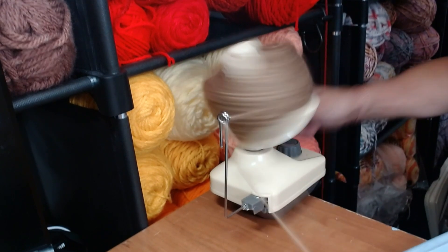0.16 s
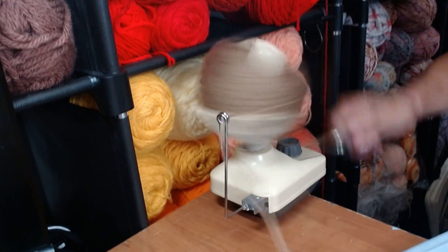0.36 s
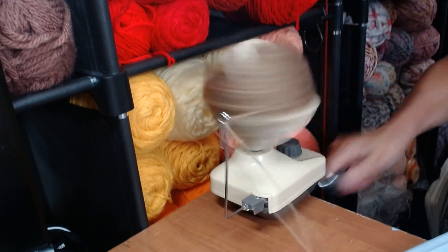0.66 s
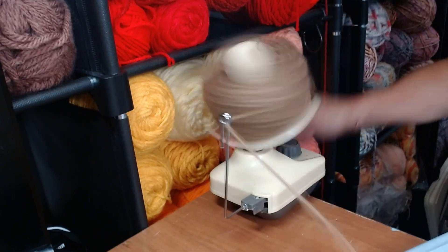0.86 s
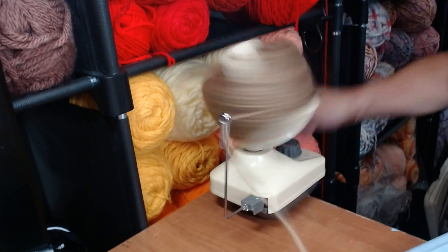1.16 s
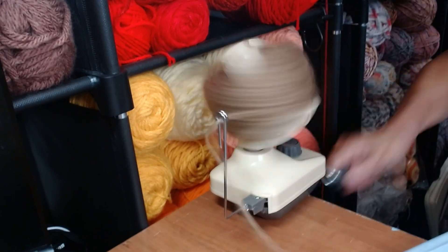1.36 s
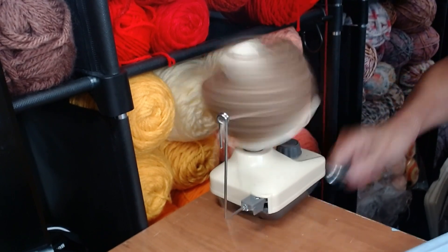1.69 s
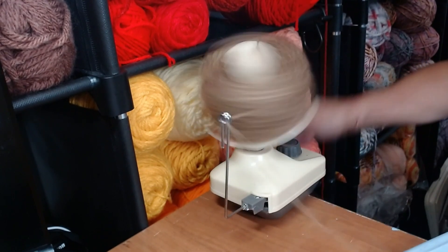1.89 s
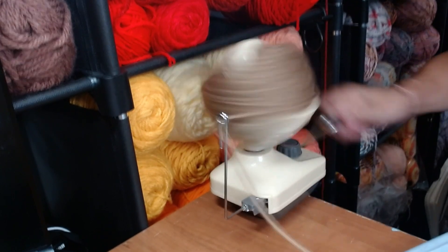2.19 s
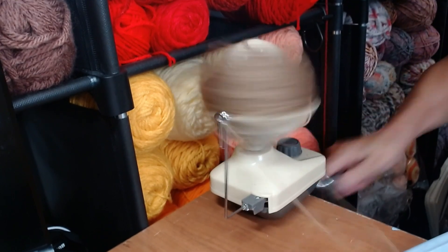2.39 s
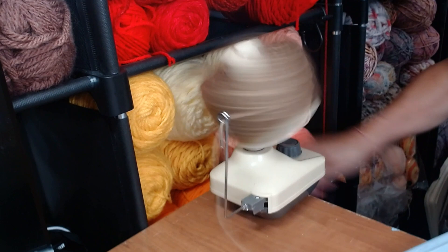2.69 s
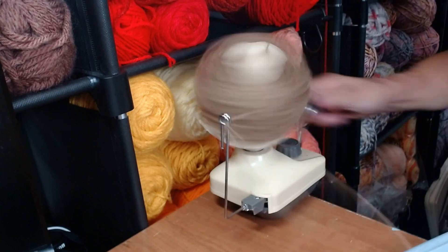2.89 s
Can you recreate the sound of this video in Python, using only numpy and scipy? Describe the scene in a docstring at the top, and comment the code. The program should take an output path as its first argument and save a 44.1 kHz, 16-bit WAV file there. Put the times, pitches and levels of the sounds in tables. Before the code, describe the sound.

A hand-cranked yarn winder hums and rattles in quick, even surges on a table.

```python
"""Yarn winder on a table

Close up in a small, dry room, one microphone. A plastic winder spins a ball of yarn, surging with each
turn of the crank, nearly three a second. Its gear teeth hum and rattle in the housing, faster and louder
in each turn, and shake the table. The yarn hisses, its wire guide chatters, something rubs about once
a turn and the plastic knocks a few times; the last turns are gentler."""
import sys
import numpy as np
from scipy import signal
from scipy.fft import rfft, irfft
from scipy.io import wavfile
from scipy.ndimage import uniform_filter1d

SR = 44100
rng = np.random.default_rng(int(sys.argv[2]) if len(sys.argv) > 2 else 0)


def unload_audio(sound):
    """Save the sound as a 16-bit wav file, at the path given as the first command line argument."""
    columns = np.transpose(np.atleast_2d(sound))
    # keep every value between -1 and 1, then stretch to whole-number steps
    steps = np.round(np.clip(columns, -1, 1) * 32767)
    wavfile.write(sys.argv[1], SR, steps.astype(np.int16))


N = 134505
T = np.arange(N) / SR

# Levels in the tables are relative, ahead of each layer's gain.
# gear speed: (time [s], tooth rate [Hz])
TOOTH_RATE = [(.06, 153.5), (.12, 134.2), (.2, 160), (.3, 179.2), (.4, 170.2), (.46, 140), (.53, 166.9),
              (.77, 179.9), (.8, 141.7), (.84, 163), (.93, 179.5), (1.1, 187.7), (1.16, 140.9),
              (1.28, 170.2), (1.35, 181.7), (1.45, 178.9), (1.51, 144.3), (1.63, 173.7), (1.81, 173.4),
              (1.86, 129.4), (1.92, 160.9), (2.09, 190), (2.2, 138), (2.33, 166.4), (2.54, 184),
              (2.61, 137.8), (2.72, 168.7), (2.79, 174), (2.94, 151.3), (3.05, 166.2)]
# gear hum: (time [s], level [dB])
HUM_LEVELS = [(0, -42.5), (.1, -42), (0.27, -29), (0.39, -32.5), (0.46, -56.5), (0.57, -30), (0.77, -32),
              (0.82, -50.5), (0.94, -24), (0.98, -36), (1.09, -23), (1.15, -42), (1.32, -28), (1.45, -30),
              (1.49, -56), (1.66, -28.5), (1.81, -41), (1.88, -68.5), (1.94, -45.5), (2.08, -28.5),
              (2.21, -62.5), (2.4, -31.5), (2.49, -44), (2.53, -31), (2.59, -64), (2.76, -34), (2.93, -59),
              (3.05, -56)]
# strongest throb of the lopsided ball in each turn: (time [s])
TURN_TIMES = [0.245, 0.597, 0.945, 1.294, 1.65, 2.012, 2.384, 2.745]
# tooth rattle, which stands for the load on the gears: (time [s], level [dB])
RATTLE_LEVELS = [(0.0, -48.5), (0.05, -43), (0.11, -46), (0.14, -42), (0.35, -39), (0.42, -55.5),
                 (0.58, -38), (0.81, -50.5), (1.04, -38.5), (1.04, -45), (1.24, -48), (1.26, -40),
                 (1.75, -51.5), (2.27, -53), (2.29, -48), (2.38, -56.5), (2.46, -43), (2.5, -61.5),
                 (2.8, -54), (2.85, -63.5), (3.05, -59)]
# plastic housing: (frequency [Hz], width [Hz], level [dB])
HOUSING_MODES = [(272, 29, -7), (347.3, 55, -4.5), (375.2, 24, 1), (433.7, 41, -6), (527.3, 54, -8.5),
                 (618.2, 21.8, 6), (666, 45, 4.5), (771, 65, -2.5), (892, 80, -9), (1024, 73, -13.5),
                 (1154, 53, -14), (1555, 46.5, -4)]
# table top: (frequency [Hz], width [Hz], level [dB])
TABLE_MODES = [(81, 35, 2), (100, 20, 0.5), (162, 62, 1.5)]
# overtones of the hum: (multiple of the tooth rate, level [dB])
HUM_OVERTONES = [(3, -50), (4, -55), (5, -57)]
# yarn sliding through the guide: (frequency [Hz], level [dB])
YARN_SPECTRUM = [(1700, 6), (2350, -5), (3200, 9), (4400, -11.5), (5600, -2.5), (7000, -8.5), (8000, -42.5)]
# yarn snagging and slipping: (time [s], level [dB], half length [s])
YARN_SNAGS = [(.1635, -49, 0.00056), (.935, -63.5, 0.008), (1.233, -57, 0.0022), (2.038, -60.5, 0.0094),
              (2.523, -57.5, 0.0028)]
# room tone: (frequency [Hz], level [dB])
ROOM_SPECTRUM = [(20, -0.5), (70, -4), (150, 2), (430, -4.5), (1000, -13), (2500, -26), (7000, -38.5)]
# touches of the wire guide: (time [s], level [dB])
GUIDE_TOUCHES = [(0.0316, -39), (0.0817, -38), (0.1778, -44), (0.19, -34), (0.2384, -32.5), (0.2634, -25.5),
                 (0.2821, -22.5), (0.3293, -23), (0.3518, -33), (0.4496, -38), (0.5023, -36.5),
                 (0.566, -37), (0.6722, -26), (0.6857, -31), (0.7011, -41), (0.783, -40.5), (0.875, -36),
                 (0.9538, -26), (1.01, -29), (1.0378, -30), (1.07, -32.5), (1.1053, -35), (1.1904, -39.5),
                 (1.3781, -32.5), (1.4275, -34.5), (1.4451, -27), (1.518, -30), (1.5431, -31.5),
                 (1.5504, -38), (1.734, -33), (1.758, -34), (1.7744, -43), (1.8649, -46), (2.0468, -34),
                 (2.0948, -38), (2.1855, -45), (2.2741, -43.5), (2.4218, -32), (2.4415, -33),
                 (2.4626, -37.5), (2.655, -45.5), (2.9375, -40.5)]
# ring of the wire guide: (frequency [Hz], level [dB], t60 [s])
GUIDE_MODES = [(2747, -10.5, 0.024), (3053, -14, 0.023), (3388, -7.5, 0.015), (3563, -5, 0.017),
               (3780, 1.5, 0.011), (3973, -2, 0.013), (4607, -23.5, 0.049), (5637, -12, 0.017),
               (5997, -10, 0.011), (6940, -27, 0.025)]
# the base bumping on the table: (time [s], level [dB])
BASE_BUMPS = [(.135, -50.5), (.24, -47.5), (.305, -40), (.71, -43.5), (1.023, -50), (1.095, -46),
              (1.365, -45.5), (1.72, -45.5), (2.086, -44.5), (2.541, -49), (2.801, -51)]
# rubs as the crank turns: (time [s], level [dB], half length [s])
TURN_RUBS = [(0.255, -49.5, 0.064), (0.535, -50.5, 0.011), (0.619, -41, 0.0078), (0.883, -50.5, 0.012),
             (0.975, -48, 0.075), (1.313, -41.5, 0.011), (1.67, -41.5, 0.013), (2.038, -48.5, 0.019),
             (2.391, -50, 0.021), (2.762, -55, 0.026)]
# loose plastic knocking: (time [s], level [dB])
PLASTIC_KNOCKS = [(1.1252, -37), (1.1391, -31), (1.477, -32.5), (1.4902, -27.5), (1.505, -31.5)]
# ring of the knocked plastic: (frequency [Hz], level [dB], t60 [s])
PLASTIC_MODES = [(1057, -15, 0.03), (1148, -3, 0.048), (1260, -10, 0.016), (1983, -13.5, 0.03),
                 (2170, -8, 0.012), (3000, -11.5, 0.027), (3350, -8, 0.0097), (4470, -7.5, 0.0028)]

HUM_THROB, RATTLE_THROB = 0.51, 0.28  # depth, as a share of the amplitude


def from_db(db):
    """Decibels to gain."""
    return 10 ** (np.asarray(db) / 20)


def rms_one(x):
    """Scale to unit rms."""
    return x / np.sqrt(np.mean(x ** 2) + 1e-20)


def hold_level(x, samples):
    """Hold a sound at unit level over a sliding window."""
    power = uniform_filter1d(uniform_filter1d(x * x, samples), samples)
    return x / np.sqrt(np.abs(power) + 1e-20)


def in_time(rows):
    """Join (time, value) points by straight lines."""
    return np.interp(T, *np.transpose(rows))


def swells(rows):
    """Bell-shaped swells from (time [s], level [dB], half length [s]) rows."""
    return sum(from_db(db) * np.exp(-.5 * ((T - s) / half) ** 2) for s, db, half in rows)


def phase_of(hz):
    """Running phase of a changing frequency."""
    return 2 * np.pi * np.cumsum(hz) / SR


def butter(x, kind, hz, order):
    """Butterworth filter."""
    return signal.sosfilt(signal.butter(order, hz, kind, fs=SR, output="sos"), x)


def drift(hz):
    """Smooth random wandering, mostly slower than hz, spread 1."""
    bins = np.arange(N // 2 + 1) * SR / N
    return rms_one(irfft(rfft(rng.standard_normal(N)) / (1 + (bins / hz) ** 2), N))


def noise(spectrum):
    """Noise with the given colour, rms 1."""
    hz, db = np.transpose(spectrum)
    bins = np.maximum(np.arange(N // 2 + 1) * SR / N, 1)
    colour = from_db(np.interp(np.log(bins), np.log(hz), db))
    return rms_one(irfft(rfft(rng.standard_normal(N)) * colour, N))


def clicks(times, sizes):
    """One impulse per contact."""
    return np.bincount(np.clip(times * SR, 0, N).astype(int), sizes, N + 1)[:N] + 1e-18


def resonate(x, modes):
    """Drive a body's resonances in parallel, signs alternating."""
    out = 0
    for k, (hz, width, db) in enumerate(modes):
        r, w = np.exp(-np.pi * width / SR), 2 * np.pi * hz / SR
        gain = (-1) ** k * from_db(db) * (1 - r * r) / 2
        out += gain * signal.lfilter([1, 0, -1], [1, -2 * r * np.cos(w), r * r], x)
    return out


def strike(times, db, modes):
    """Each contact rings every mode with a strength of its own."""
    out, spread_db = 0, rng.standard_normal((len(times), len(modes)))
    for k, (hz, mode_db, t60) in enumerate(modes):
        r, w = from_db(-60 / (t60 * SR)), 2 * np.pi * hz / SR
        hits = clicks(times, from_db(db + mode_db + spread_db[:, k]))
        out += (-1) ** k * signal.lfilter([0, r * np.sin(w)], [1, -2 * r * np.cos(w), r * r], hits)
    return out


def ball_throb(depth, period_s=0.0777):
    """The lopsided ball wobbles, swelling and pinching the sound about five times a turn."""
    turns = np.array(TURN_TIMES)
    nearest = turns[np.argmin(np.abs(T[:, None] - period_s - turns), axis=1)]
    wobble = uniform_filter1d(np.cos(2 * np.pi * (T - nearest) / period_s), size=400)
    return 1 + depth * wobble


def crank_pace(lag_s=.033):
    """Pace of the crank: 1 at the fastest point of each turn, 0 at the slowest."""
    turn_s = np.mean(np.diff(TURN_TIMES))
    fastest = np.r_[TURN_TIMES[0] - turn_s, TURN_TIMES, TURN_TIMES[-1] + turn_s] + lag_s
    turns_done = np.interp(T, fastest, np.arange(len(fastest)))
    return np.cos(np.pi * turns_done) ** 2


def gear_hum(gain_db=-4, jitter=.035, roughness=.15):
    """The meshing gears sound a tone at the tooth rate, a little rough and throbbing."""
    hz = in_time(TOOTH_RATE) * (1 + jitter * drift(hz=46))
    tone = np.sqrt(2) * np.sin(phase_of(hz))
    level = from_db(in_time(HUM_LEVELS) + gain_db) * ball_throb(HUM_THROB)
    return level * (1 + roughness * drift(hz=36)) * tone


def tooth_rattle(gain_db=-3, jitter_teeth=.03, spread_db=4.5, grit_db=-2.5):
    """Each tooth taps the housing unevenly, then slides with a little grit."""
    teeth_passed = np.cumsum(in_time(TOOTH_RATE)) / SR
    teeth = np.arange(1, int(teeth_passed[-1]))
    lateness, force = rng.standard_normal((len(teeth), 2)).T
    tap_times = np.interp(teeth + jitter_teeth * lateness, teeth_passed, T)
    taps = clicks(tap_times, from_db(spread_db * force))
    grit = rng.standard_normal(N) * (1 - teeth_passed % 1) ** 2
    housing = resonate(rms_one(taps) + from_db(grit_db) * rms_one(grit), HOUSING_MODES)
    housing = butter(housing, "band", hz=[220, 2200], order=2)
    level = from_db(in_time(RATTLE_LEVELS) + gain_db) * ball_throb(RATTLE_THROB)
    return level * hold_level(housing, samples=1100)


def table_rumble(hum_db, load_db, gain_db=-48.5):
    """The shaking base makes the table rumble, partly following the hum and the load."""
    top = resonate(rng.standard_normal(N), TABLE_MODES)
    rumble = butter(top, "band", hz=[60, 190], order=2)
    return from_db(gain_db + 0.28 * hum_db + 0.6 * load_db) * hold_level(rumble, samples=2000)


def gear_whine(load_db, slow_hz=390, fast_hz=1010, crank_db=-49, jitter=.018, flicker_db=3.5):
    """The crank gear's whine arches through the housing's resonances each turn, over the hum's overtones."""
    partials = [(slow_hz + (fast_hz - slow_hz) * crank_pace(), crank_db)]
    partials += [(multiple * in_time(TOOTH_RATE), db) for multiple, db in HUM_OVERTONES]
    unsteady = 1 + jitter * drift(hz=40.8)
    tones = 0
    for hz, db in partials:
        tones += from_db(db + flicker_db * drift(hz=25)) * np.sin(phase_of(hz * unsteady))
    roughness = 1 + .3 * drift(hz=40)
    return from_db(.7 * load_db) * roughness * resonate(tones, HOUSING_MODES)


def yarn_hiss(load_db, gain_db=-66, flicker_db=1.5):
    """The running yarn gives a grainy hiss, and a brighter rasp where it snags."""
    rasp = rms_one(butter(noise(YARN_SPECTRUM), "high", hz=4300, order=4))
    level = from_db(gain_db + 0.96 * load_db + flicker_db * drift(hz=110))
    return level * noise(YARN_SPECTRUM) + swells(YARN_SNAGS) * rasp


def room_tone(level_db=-58):
    """The room's own low, steady noise behind the winder."""
    return from_db(level_db) * noise(ROOM_SPECTRUM)


def wire_scrapes(times, db, catches=3, scrape_s=.002):
    """Each contact of the wire is a tiny scrape: a few quick catches share its energy."""
    catch_times = times[:, None] + scrape_s * rng.random((len(times), catches))
    catch_db = np.repeat(db - 10 * np.log10(catches), catches)
    return strike(catch_times.ravel(), catch_db, GUIDE_MODES)


def wire_bounces(times, db, gap_s=.003):
    """Every touch of the wire is a short run: a light graze, the main contact, two weakening bounces."""
    steps_db = np.array([-10, 0, -4, -8])
    gaps = gap_s * rng.uniform(0.64, 1.6, (len(times), len(steps_db)))
    offsets = np.cumsum(gaps, axis=1)
    contacts = times[:, None] + offsets - offsets[:, 1:2]  # the main contact lands on time
    return wire_scrapes(contacts.ravel(), (db[:, None] + steps_db).ravel())


def guide_chatter(load_db, chatter_db=-8.5, ticks_per_s=55, tick_db=-63, spread_db=4):
    """The wire guide chatters, and ticks lightly all the while, louder under load."""
    times, db = np.transpose(GUIDE_TOUCHES)
    ticks_db = tick_db + 0.52 * load_db + spread_db * np.minimum(rng.exponential(1, N), 3)
    ticking = rng.random(N) < ticks_per_s / SR
    return wire_bounces(times, db + chatter_db) + wire_bounces(T[ticking], ticks_db[ticking])


def base_bumps(half_length_s=0.02):
    """The base bumps the table: soft, spread-out pushes reach only the housing's lowest resonances."""
    push = butter(rng.standard_normal(N), "band", hz=[230, 507], order=4)
    level = swells([(s, db, half_length_s) for s, db in BASE_BUMPS])
    return level * hold_level(resonate(push, HOUSING_MODES), samples=700)


def rubs(gain_db=-1.5, main_hz=1565, bend_hz=100, upper_hz=3423, upper_db=-16, width_hz=35):
    """Something scrapes: a narrow, rough band that bends with the crank, and a fainter, higher one."""
    bent_hz = main_hz - bend_hz * (1 - crank_pace())
    scrape = 0
    for hz, db in ((bent_hz, 0), (np.full(N, upper_hz), upper_db)):
        phase = phase_of(hz)
        band = drift(width_hz) * np.cos(phase) + drift(width_hz) * np.sin(phase)
        scrape += from_db(db) * hold_level(band, samples=600)
    return from_db(gain_db) * scrape * swells(TURN_RUBS) * ball_throb(RATTLE_THROB)


def plastic_knocks():
    """Loose plastic knocks and rings briefly."""
    times, db = np.transpose(PLASTIC_KNOCKS)
    return strike(times, db, PLASTIC_MODES)


def room_tail(x, t60_s=.1, gain_db=-12.5, delay_s=.004):
    """The small room returns a short diffuse tail, soaked up by shelves of wool."""
    tail = rng.standard_normal(N) * from_db(-60 * T / t60_s) * (T > delay_s)
    return from_db(gain_db) * signal.fftconvolve(x, tail / np.linalg.norm(tail))[:N]


def scene():
    """The winder from close by, its small noises following the load on the gears."""
    hum_db, load_db = in_time(HUM_LEVELS), in_time(RATTLE_LEVELS)
    hum_db, load_db = hum_db - hum_db.mean(), load_db - load_db.mean()
    low_end = gear_hum() + table_rumble(hum_db, load_db) + room_tone()
    parts = tooth_rattle() + gear_whine(load_db) + yarn_hiss(load_db) + guide_chatter(load_db)
    parts += base_bumps() + rubs() + plastic_knocks()
    return (low_end + parts + room_tail(parts))[None]


def record(dry):
    """The microphone's one channel, its top cut steeply: 60 dB down from 8200 Hz."""
    return signal.sosfilt(signal.cheby2(16, 60, 8200, fs=SR, output="sos"), dry)


dry = scene()
out = record(dry)
unload_audio(out)
```